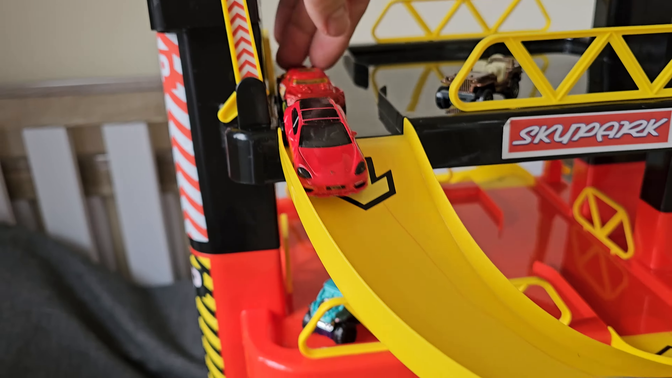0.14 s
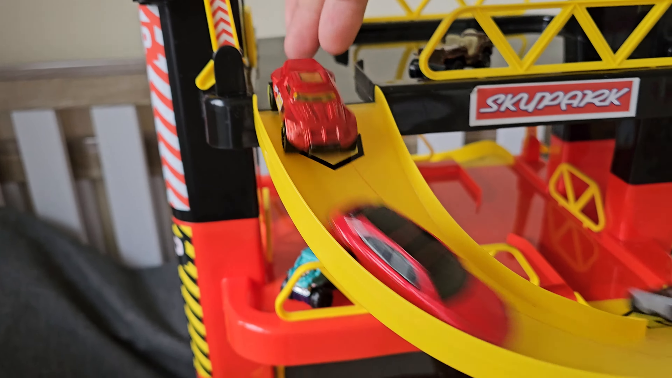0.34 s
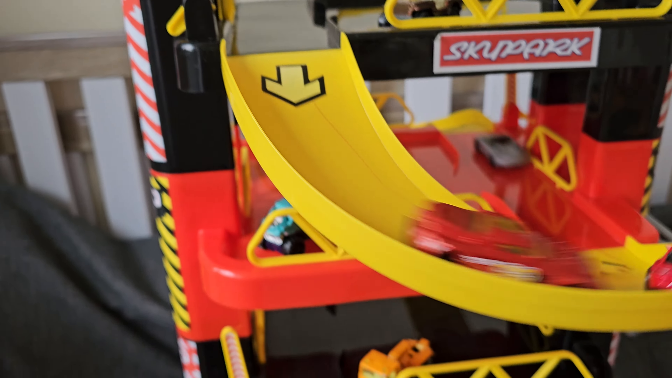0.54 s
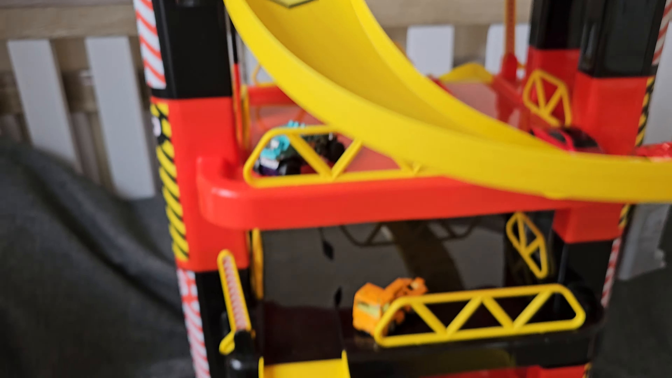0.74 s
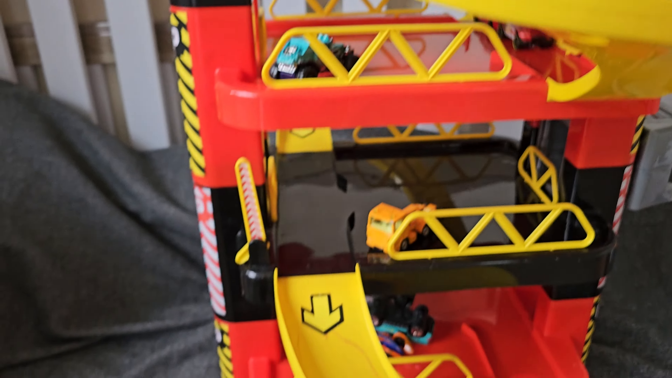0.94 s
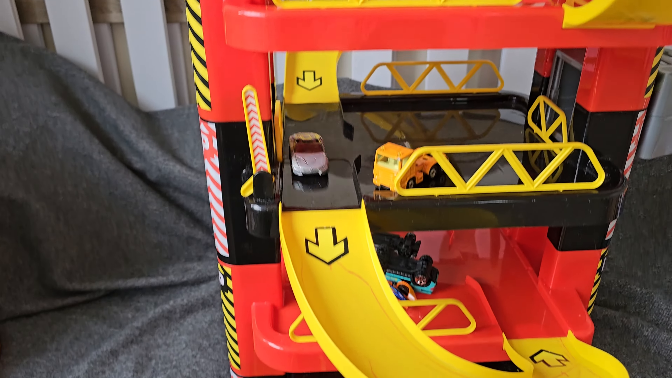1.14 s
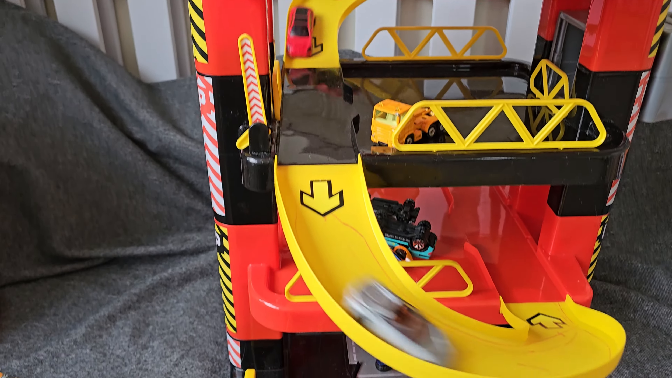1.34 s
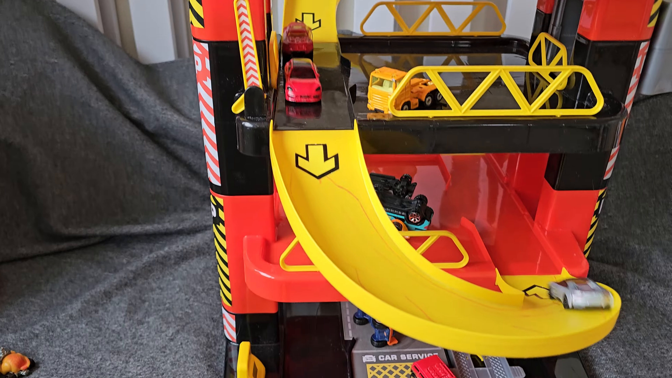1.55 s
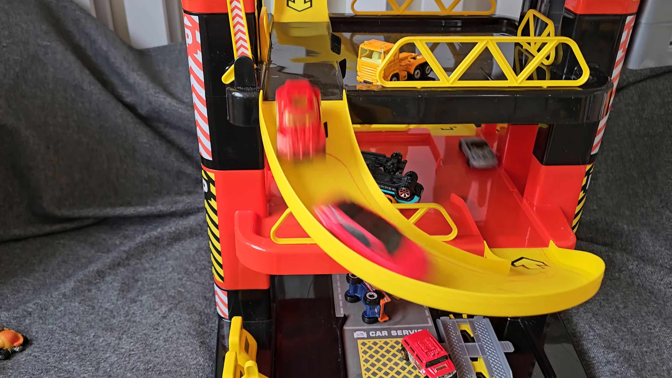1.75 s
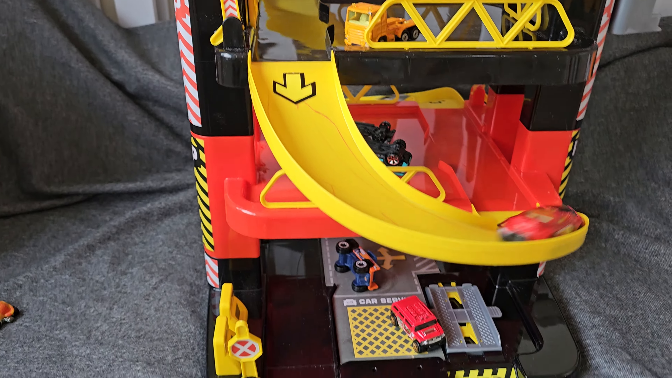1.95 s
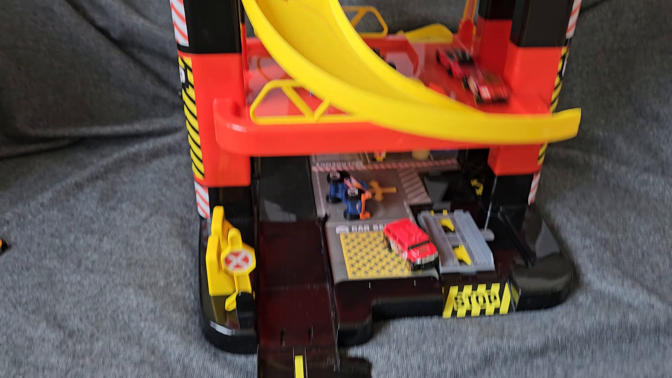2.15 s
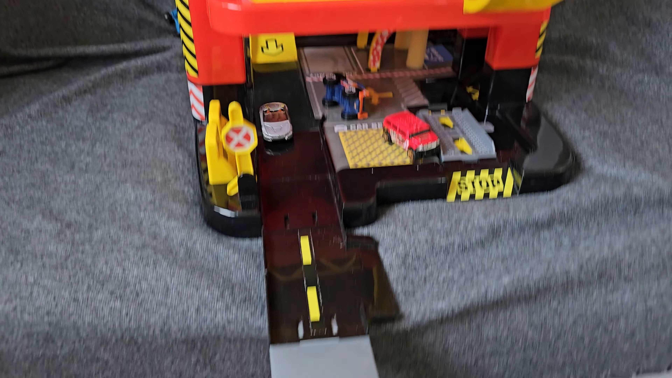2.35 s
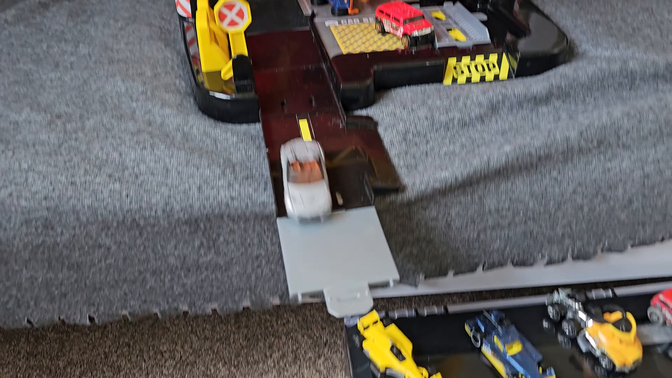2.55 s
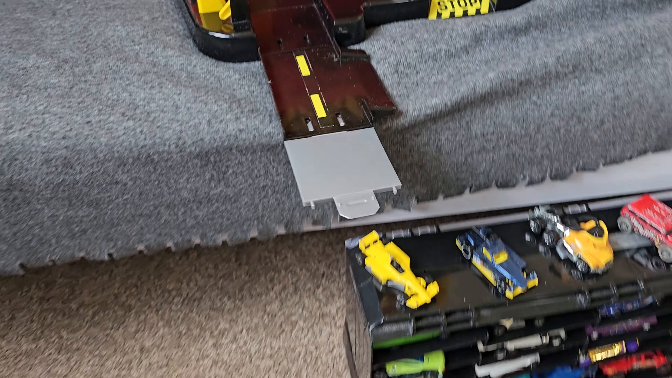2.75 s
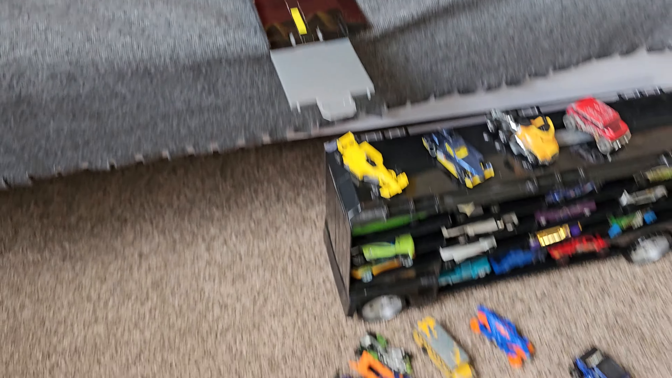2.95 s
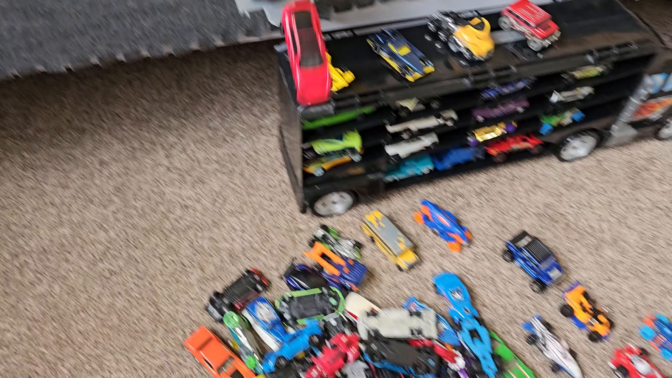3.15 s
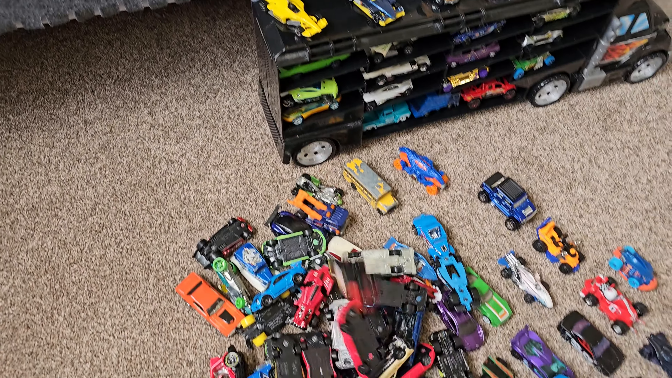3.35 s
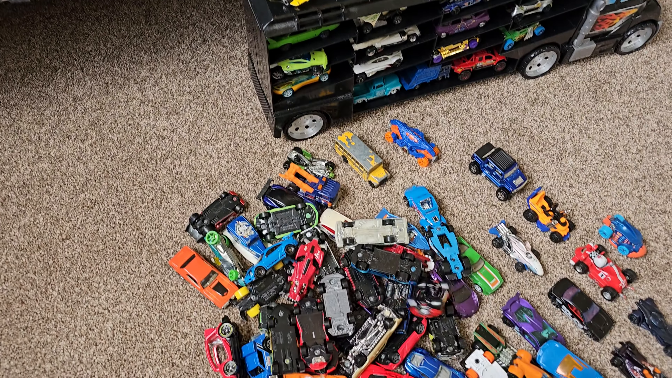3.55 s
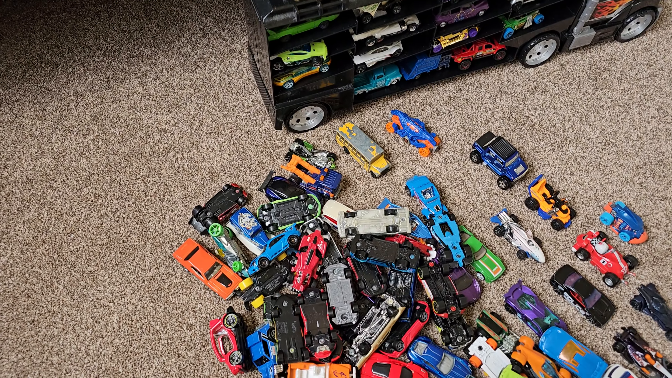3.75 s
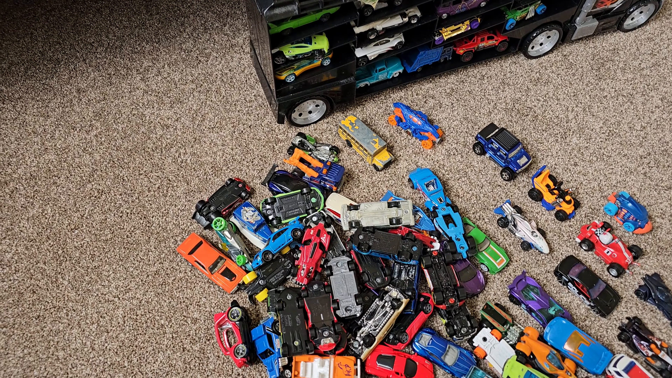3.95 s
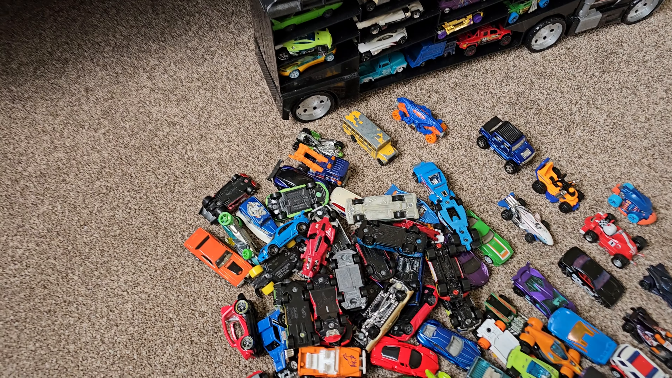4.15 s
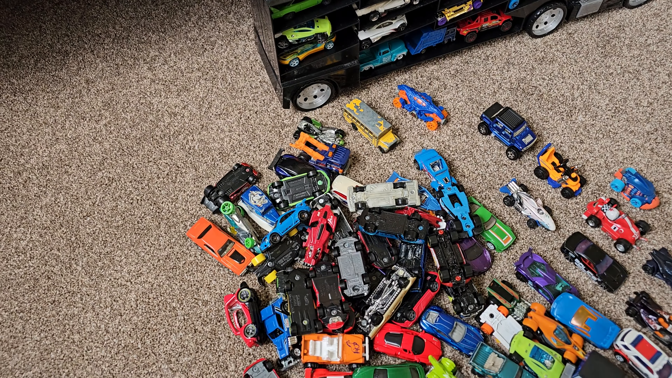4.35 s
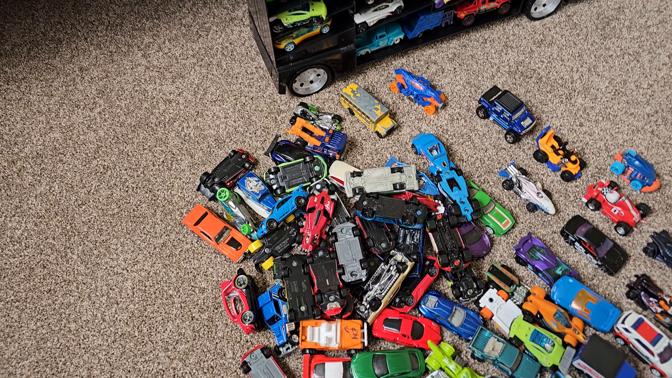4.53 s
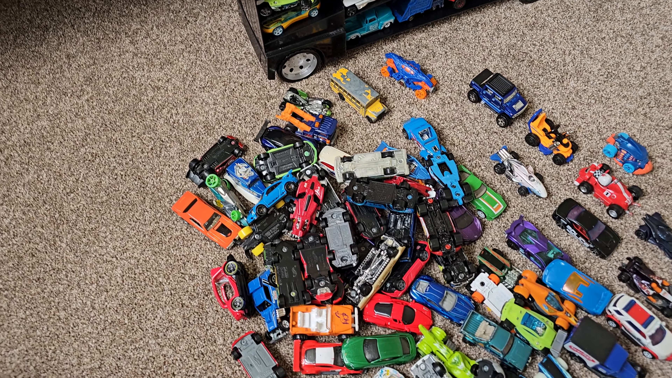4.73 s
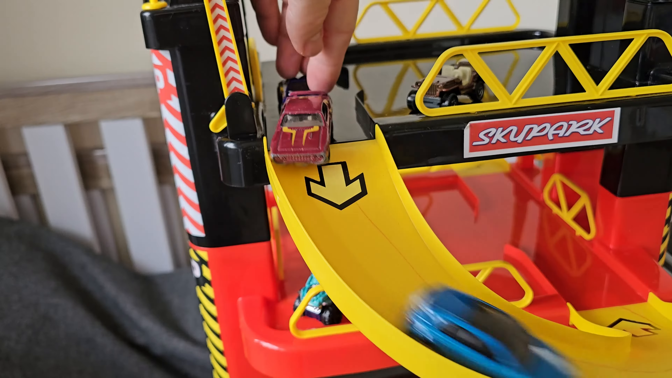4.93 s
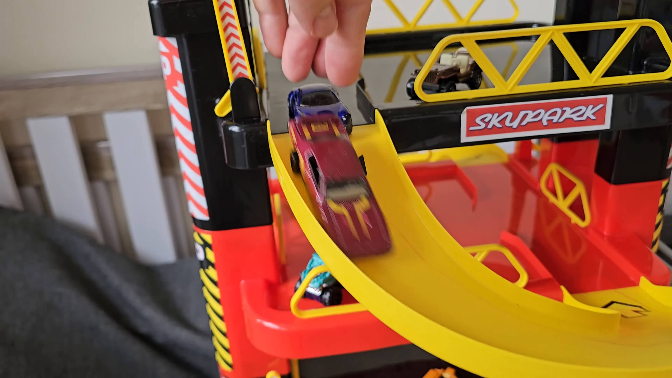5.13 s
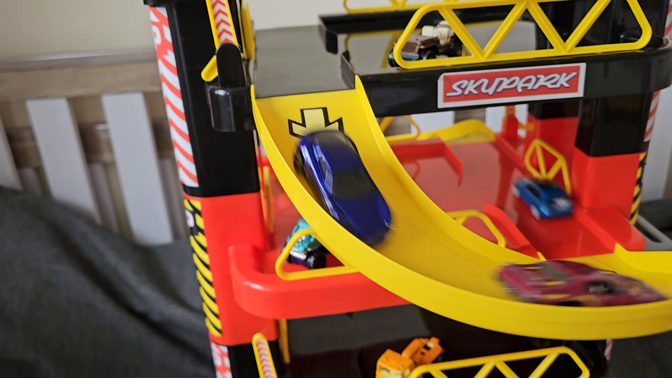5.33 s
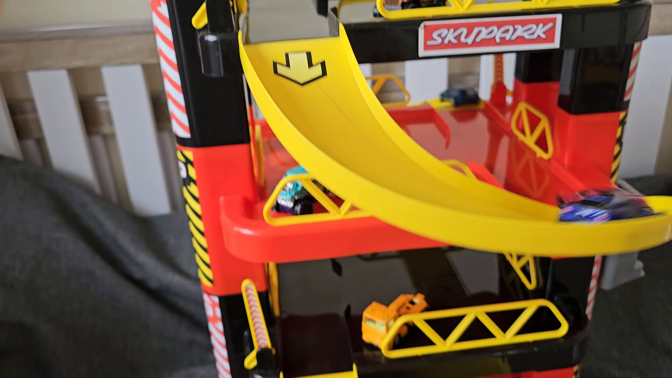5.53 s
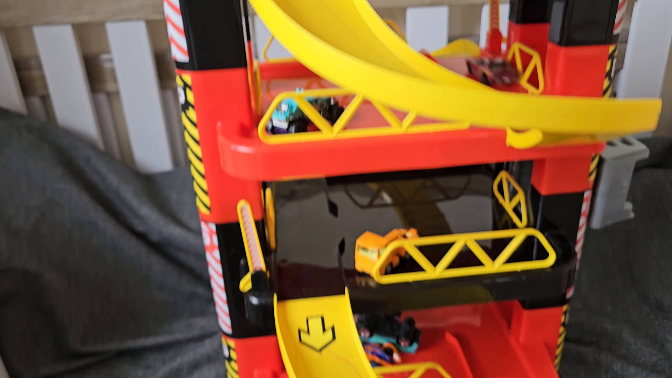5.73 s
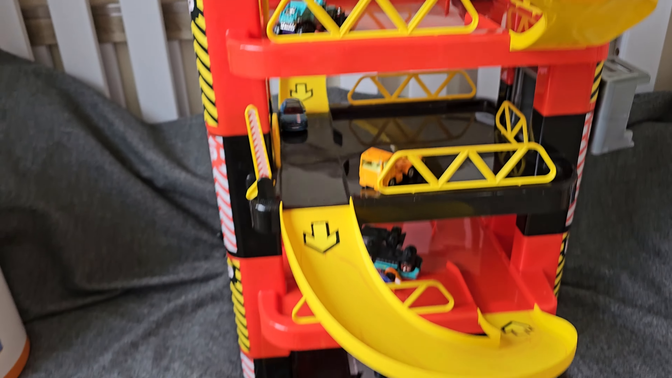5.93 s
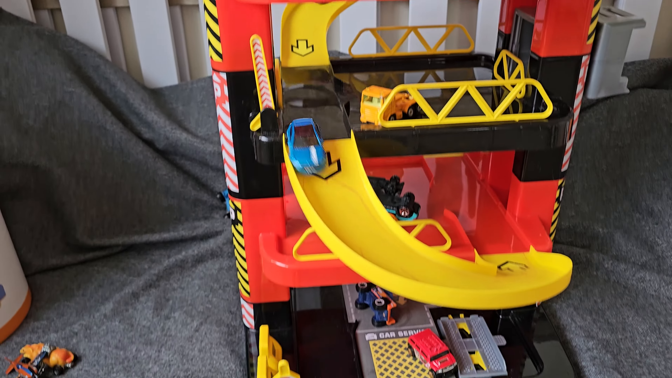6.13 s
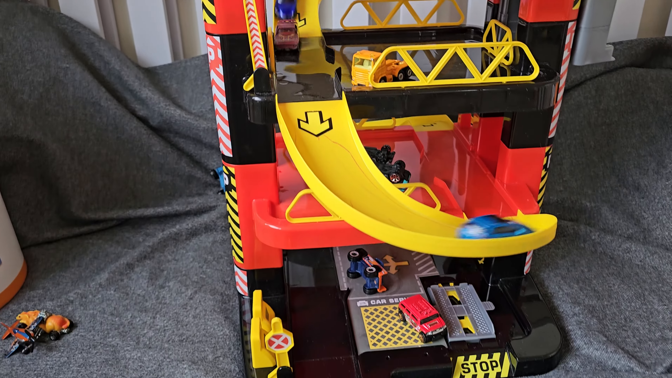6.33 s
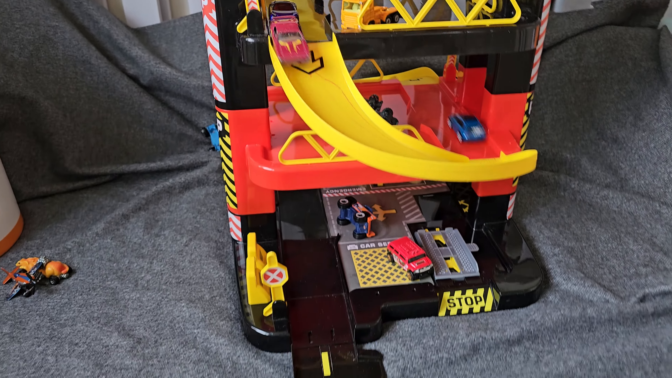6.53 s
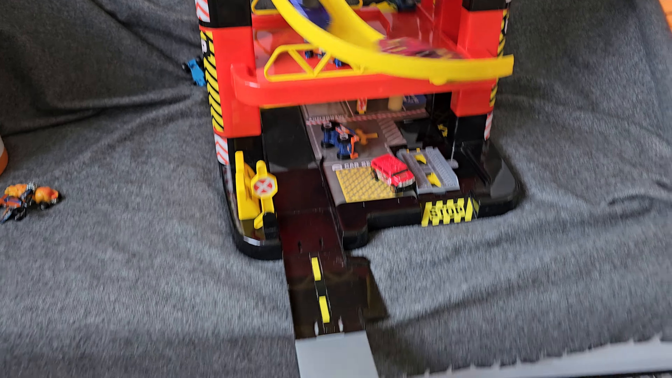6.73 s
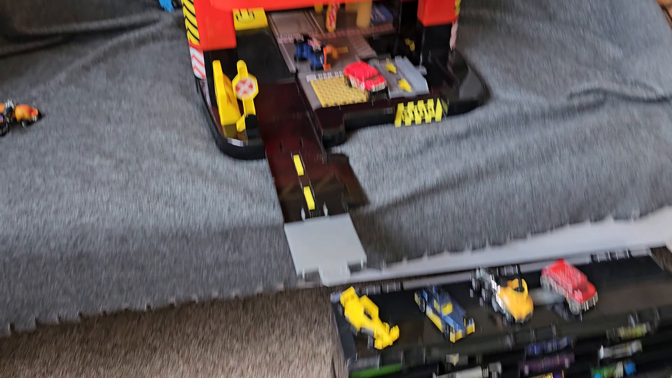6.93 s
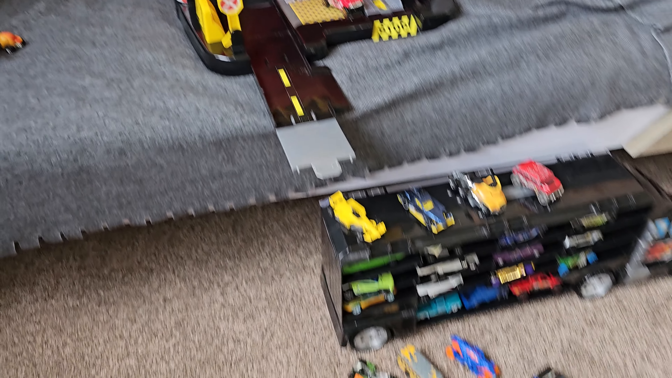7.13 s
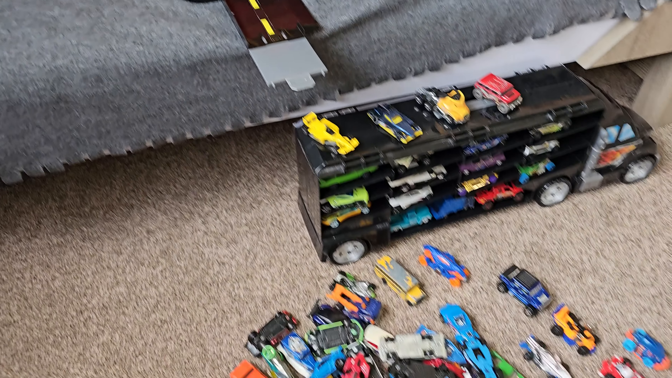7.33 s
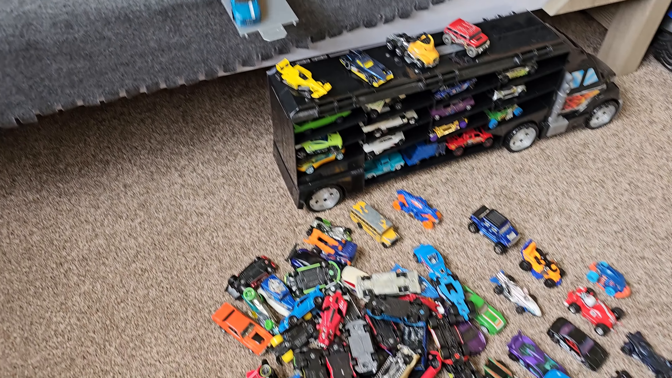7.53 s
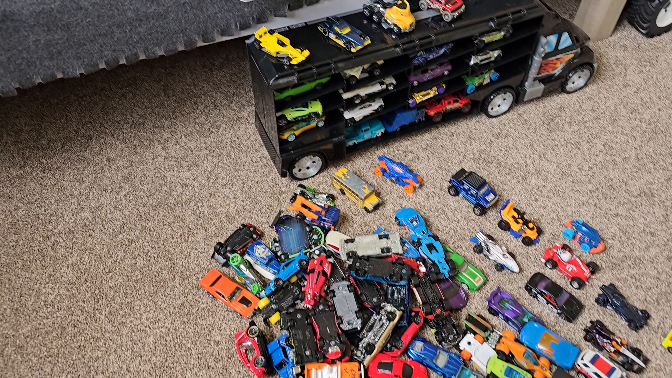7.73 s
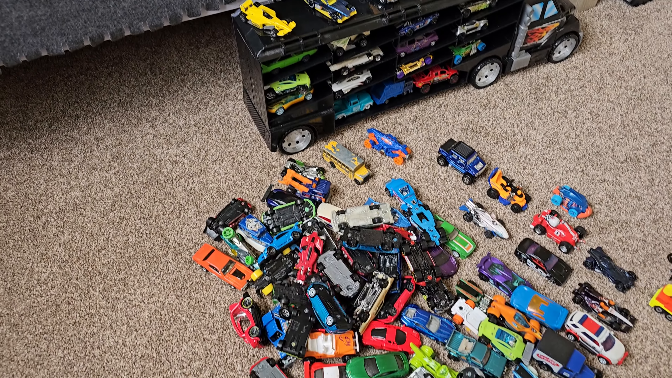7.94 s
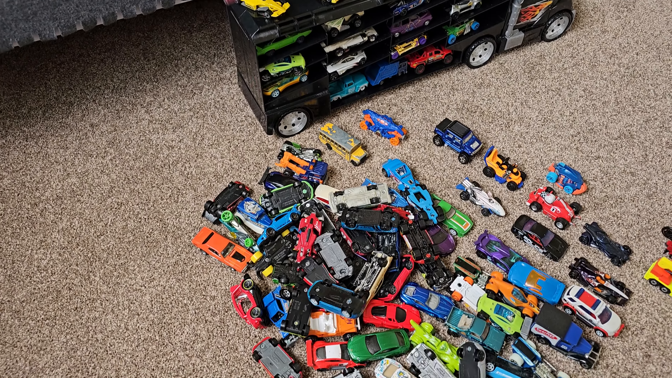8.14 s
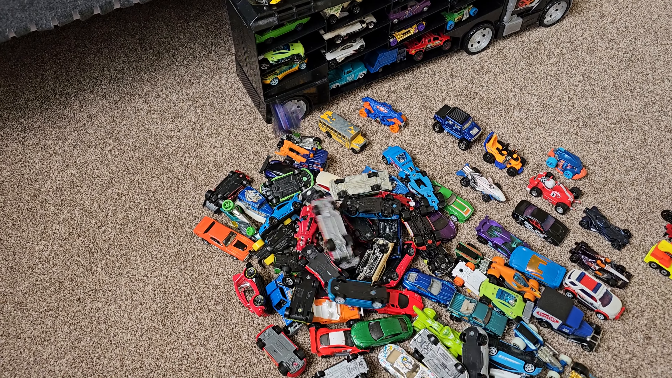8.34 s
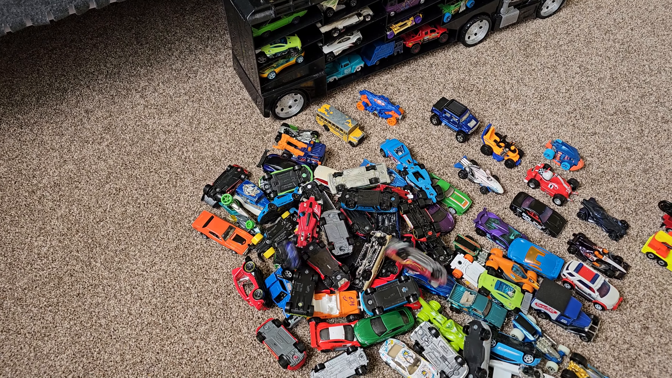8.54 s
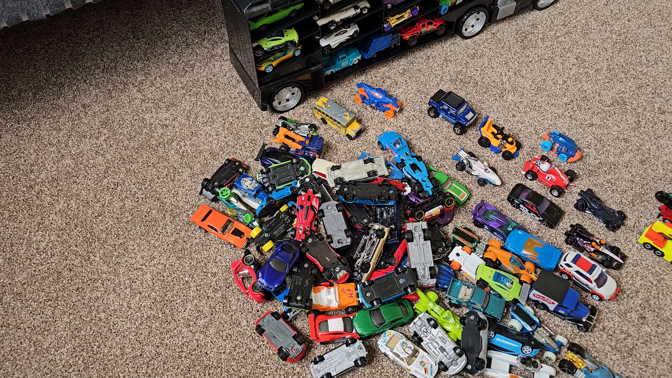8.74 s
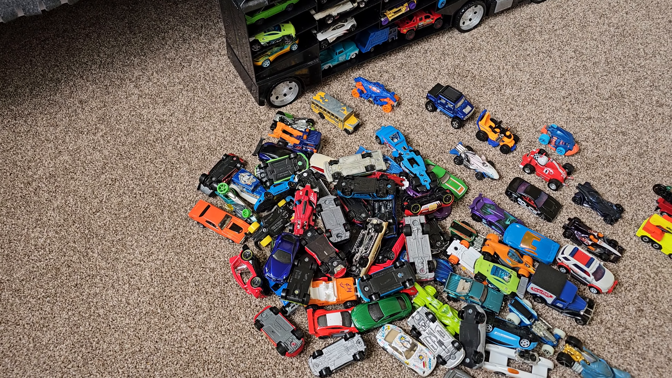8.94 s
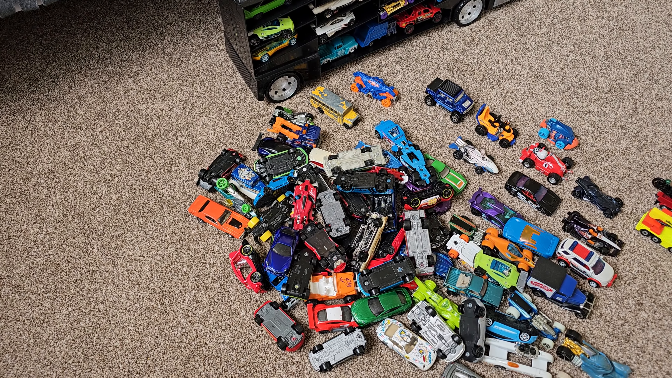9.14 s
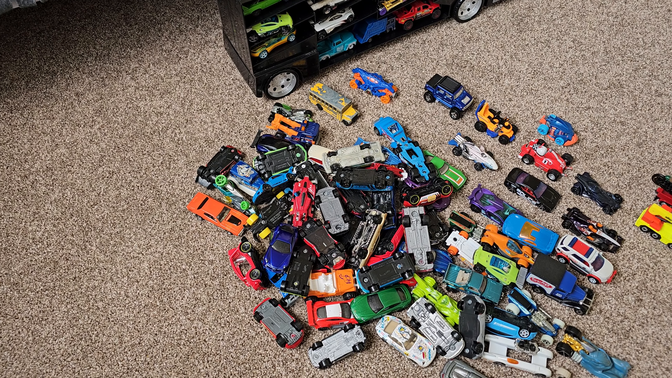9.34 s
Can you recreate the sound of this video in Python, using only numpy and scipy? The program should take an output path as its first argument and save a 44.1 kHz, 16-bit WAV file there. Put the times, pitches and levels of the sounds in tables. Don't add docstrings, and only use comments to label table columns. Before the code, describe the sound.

Small metal toy cars rattle and whir down plastic ramps, knocking at joints, then crash and clatter onto a heap of cars, twice, heard close indoors.

```python
import sys
import numpy as np
from scipy import signal
from scipy.io import wavfile

SR = 44100
rng = np.random.default_rng(int(sys.argv[2]) if len(sys.argv) > 2 else 0)


def pcm_store(signal):
    levels = np.round(np.clip(np.atleast_2d(signal), -1, 1) * 32767)
    wavfile.write(sys.argv[1], SR, levels.astype(np.int16).T)


def boost(x):
    u = np.asarray(x, float) / 20
    return 10 ** u


N = 413658
T = np.arange(N) / SR
BAND_EDGES_HZ = 30 * 2 ** np.arange(0, 9.2, .5)
BOTH, OPPOSED = np.array([[1.], [1.]]), np.array([[1], [-1]])

# frequency in Hz, density in dB per Hz.
HISS = [(76, -31), (130, -0.5), (315, -7), (613, -13), (3000, -18), (5000, -19), (7600, -17.5),
        (16000, -40)]
# frequency in Hz, likeness from 0 to 1.
LIKENESS = [(60, 0.52), (180, 0.54), (550, 0.43), (1650, 0.22), (4970, 0.14)]
# time in seconds, sway in dB.
GRIPS = [
    (4.14, -58),
    (4.355, -69),
    (4.6, -58.5),
    (4.82, -77),
]
# start in seconds, peak in dB, ring in Hz, pan in dB.
TICKS = [(0.122, -53, 640, 22), (4.092, -59, 3000, -1.5), (4.1215, -47, 1236, -13.5),
         (4.152, -47.5, 517, -8.5), (4.172, -53, 492, -12), (4.365, -54, 3000, -7),
         (4.3698, -45.5, 1190, -7), (4.4965, -57.5, 514, -5.5), (4.558, -51.5, 1110, -9),
         (4.564, -48.5, 4210, 13), (4.575, -53, 4150, 6), (4.597, -50, 6300, 11), (4.611, -37.5, 520, 0),
         (4.6335, -42, 600, -7.5), (4.8147, -34.5, 1700, 19.5), (8.76, -48, 330, 6),
         (8.801, -34, 423, -0.5), (8.86, -50.5, 330, 0), (8.92, -60, 320, 4), (8.975, -52, 334, 1),
         (9.1047, -60, 3600, -2), (9.166, -55, 3160, -3.5), (9.173, -55.5, 3730, -13.5),
         (9.2423, -63, 3530, 6),
         (4.941, -48.5, 520, 13.5), (4.1, -67.5, 3000, -0.5), (4.2, -63, 1700, 1),
               (4.267, -69, 6000, 0), (4.294, -65, 3000, 0.5), (4.342, -65, 5970, 2),
               (4.352, -63, 7500, -0.5), (4.375, -56, 3480, 2), (4.405, -58, 4000, 3),
               (4.585, -53.5, 3480, 8.5), (4.68, -70, 2490, 0), (4.773, -69.5, 3500, 1)]
# time in seconds, wheel speed as rattle in dB,
# weight bearing on the tower in dB.
RUNS = [
    [(.2, -35, -48), (.45, -30, -52), (1.2, -31, -46), (1.9, -28, -42.5), (2.25, -30.5, -38),
     (2.75, -33, -47), (2.95, -32, -31.5), (3.13, -34.5, -41), (3.3, -56, -58)],
    [(5.01, -33, -41.5), (5.25, -30, -46), (5.85, -32.5, -46.5), (6.4, -29.5, -40.5), (6.9, -31, -43),
     (7.5, -35, -48), (7.8, -31, -38.5), (8.06, -33, -39.5), (8.3, -51, -73)],
]
# frequency in Hz, density in dB per Hz.
ROLLING = [(30, -6.5), (103, -1.5), (266, 2), (328, -3.5), (721, 1.5), (2170, -12), (7470, -8),
           (16000, -13)]
# frequency in Hz, width in Hz, level in dB.
CHASSIS = [(2274, 88, -6.5), (2970, 830, -5.5), (4100, 8400, -10.5)]
# frequency in Hz, width in Hz, level in dB.
DECK_PANELS = [(455, 230, -4), (600, 230, -1), (790, 49, -2)]
# frequency in Hz, width in Hz, level in dB.
DECK_SPANS = [(248, 71, 7.5), (277, 22, -1.5)]
# frequency in Hz, width in Hz, level in dB.
TOWER = [(58, 35, 3.5), (88, 36, 9.5), (124, 40, -9.5)]
# start in seconds, length in seconds, treble loss in dB.
SHADES = [(.87, 0.053, 13), (.95, 0.037, 10), (2.08, .27, 5.5), (2.68, .14, 11), (5.03, .1, 1),
          (5.73, 0.13, 10), (5.98, 0.071, 2), (6.5, .14, 4.5), (7.11, 0.16, 4.5), (7.62, .15, 6)]
# start in seconds, deck knock peak in dB, deck pitch in Hz, sag of the span in dB.
JOINTS = [(0.348, -21, 262, -43), (0.434, -29, 266, -44.5), (0.652, -24.5, 269, -43),
          (0.762, -27, 260, -48), (0.992, -21, 480, -41), (1.291, -22.5, 566, -38.5),
          (1.357, -20, 490, -37.5), (1.59, -28, 255, -39), (1.673, -26, 646, -38), (1.714, -21, 460, -48),
          (1.79, -22, 546, -45), (1.97, -20, 790, -54.5), (2.162, -17.5, 455, -40), (2.397, -20, 252, -34),
          (2.447, -30, 230, -41), (2.589, -20.5, 460, -38), (5.206, -23.5, 405, -39), (5.32, -25, 260, -46),
          (5.661, -18.5, 590, -41), (5.873, -18.5, 490, -39), (6.262, -23.5, 300, -42),
          (6.372, -14.5, 640, -44), (6.797, -28.5, 450, -55), (6.993, -24, 560, -42),
          (7.067, -18, 487, -37), (7.099, -33, 554, -52), (7.34, -24, 242, -33.5), (7.59, -29, 512, -38),
          (7.917, -25, 235, -30.5)]
# start in seconds, peak in dB, ring in Hz.
NUDGES = [(0.352, -17, 3030), (0.4059, -21, 4300), (0.497, -23, 2150), (0.5385, -23, 7050),
          (0.649, -20, 3870), (0.6653, -27, 7110), (0.7077, -17.5, 2800), (0.9317, -21, 6430),
          (1.011, -21, 3210), (1.0598, -18, 8100), (1.1254, -33, 2900), (1.2973, -21, 2360),
          (1.3585, -11.5, 2500), (1.376, -13.5, 7400), (1.4085, -15.5, 2620), (1.519, -23, 2040),
          (1.5645, -23, 7350), (1.6899, -27, 2290), (1.7163, -25, 2780), (1.7688, -12, 2570),
          (1.795, -22, 2100), (1.8396, -12, 2230), (2.061, -15.5, 3680), (2.1663, -19.5, 2090),
          (2.201, -24, 2060), (2.222, -19, 8000), (2.25, -35, 3150), (2.3616, -14.5, 5500),
          (2.4117, -11, 7300), (2.4447, -15, 7100), (2.449, -19, 5030), (2.497, -18.5, 7700),
          (2.5909, -16.5, 2300), (2.6402, -16, 2060), (5.2093, -18, 2970), (5.2533, -16, 3750),
          (5.3382, -18.5, 2050), (5.6413, -24, 7940), (5.667, -17, 2800), (5.7079, -17.5, 3090),
          (5.873, -25, 2100), (5.916, -14.5, 3680), (6.042, -21, 2310), (6.2591, -18, 2370),
          (6.3, -19, 2860), (6.3744, -17, 3450), (6.404, -14.5, 3320), (6.3743, -14.5, 1710),
          (6.449, -17, 3260), (6.4958, -19, 3120), (6.546, -31, 3140), (6.693, -19, 2300),
          (6.7434, -23, 6470), (6.8217, -23, 7350), (7.334, -13.5, 4640), (7.3716, -10.5, 7600),
          (7.4197, -19, 4230), (7.0432, -16.5, 3830), (7.4588, -20.5, 4940), (7.6526, -22, 3590)]
# frequency in Hz, level in dB, t60 in seconds.
CAR_BODY = [(1308, -3, 0.054), (2000, -3.5, 0.13), (3000, -20, 0.082), (4150, -3, 0.042),
            (6430, -6.5, 0.061), (7500, -6.5, 0.0034)]
# start in seconds, peak in dB, frequency in Hz, t60 in seconds.
PINGS = [(.93, -20, 6430, 0.09), (1.769, -16.5, 2510, 0.056), (3.374, -13, 6430, 0.14),
         (3.437, -34, 2870, 0.088), (3.448, -27, 2000, 0.13), (3.563, -34, 6300, 0.11),
         (3.658, -47, 3100, 0.16), (3.686, -57, 4610, 0.096), (8.5, -29, 6300, 0.067),
         (8.447, -18.5, 1910, 0.16), (8.495, -24, 1890, .12), (8.567, -29.5, 1200, 0.11),
         (8.63, -36, 1197, 0.12), (8.662, -43, 6450, 0.13), (2.062, -27, 6430, .12),
         (7.722, -31, 11650, 0.083), (6.578, -32, 3870, .1)]
# start in seconds, length in seconds, level in dB.
CROSSINGS = [(1.72, 0.062, -36.5), (2.17, 0.16, -43), (2.4, 0.11, -48), (2.59, 0.043, -44),
             (7.061, 0.1355, -38.5), (7.58, 0.1, -36), (7.9, 0.092, -56)]
# frequency in Hz, width in Hz, level in dB.
LOOSE_SPAN = [(233.2, 6.9, -4.5), (455, 15, -4), (590, 30, -5.5), (690, 17, -19)]
# start in seconds, peak in dB, ring in Hz,
# treble over peak in dB, pan in dB.
CRASHES_1 = [(2.8305, 2.5, 1950, -11, -1.5), (2.8384, -1, 2760, -31.5, 3), (2.9262, -14, 2800, -23, 3),
             (2.9572, -17, 2030, -10, -0.5), (2.9921, -19, 2380, -16, 2.5), (3.0155, -20, 6600, -12.5, -4),
             (3.0464, -13.5, 7500, -13.5, -2), (3.0535, -4.5, 3840, -6, -0.5),
             (3.0654, -18.5, 3630, -10, 5), (3.0874, -12.5, 7650, -18, 3), (3.1954, -25, 2370, -11, 2)]
# start in seconds, peak in dB, ring in Hz,
# treble over peak in dB, pan in dB.
LANDINGS_1 = [(3.308, -5, 2160, -4, 2), (3.3191, 1, 2020, -33, 4.5), (3.326, -9, 1940, -38, 8),
              (3.365, -1.5, 6550, -9, -4), (3.3988, -6, 7550, -4, 1), (3.386, -11.5, 6500, -20, 3),
              (3.455, -6.5, 6500, -12.5, 1), (3.474, -18, 4000, -6, -2), (3.4349, -7.5, 3330, -46, 4.5),
              (3.5013, -17.5, 4080, -24, 0), (3.544, -16.5, 7100, -11, 3), (3.564, -14.5, 6330, -16, -0.5),
              (3.638, -35, 1500, -15, 0), (3.6567, -29.5, 1770, -16, 2), (3.684, -35, 4610, -20, -6),
              (3.738, -42, 6600, 0, -1), (3.7735, -40, 4060, -25, 3), (3.781, -47, 2200, -19, 1),
              (3.804, -56, 2670, -26, 4), (3.824, -43.5, 5300, -5, 0)]
# start in seconds, peak in dB, ring in Hz,
# treble over peak in dB, pan in dB.
CRASHES_2 = [(7.7815, -5.5, 2920, -3.5, 0), (7.795, -5, 4030, -37, 4), (7.8652, -19, 4840, -31, 13),
             (7.909, -15.5, 4500, -13.5, 5), (7.9197, -10.5, 2410, -9, 3), (7.9458, -11.5, 3900, -14, 6),
             (7.9703, -12, 3660, -13, -3), (7.986, -18, 2500, -9, 7), (8.005, -28.5, 3500, -7, 0),
             (8.0294, -20.5, 5130, -16, 11), (8.1823, -27, 3830, -10, 4), (8.227, -32.5, 2300, -7.5, 10)]
# start in seconds, peak in dB, ring in Hz,
# treble over peak in dB, pan in dB.
LANDINGS_2 = [(8.306, -17, 3530, -11, 7), (8.323, -3.5, 3800, -7, 1), (8.346, 1, 2000, -10.5, -1.5),
              (8.401, -2.5, 3770, -6.5, 1), (8.4085, -6, 8200, -34, -3), (8.4251, -0.5, 2560, -9.5, 0),
              (8.428, -12, 4160, -7.5, -2), (8.433, -2, 1600, -10, 0), (8.445, -12, 1910, -18.5, 3),
              (8.4819, -7, 6355, -7, 4), (8.4976, -10.5, 6360, -17, 6), (8.5515, -18, 1850, -9, 3),
              (8.5644, -7, 6400, -12, -1), (8.6045, -11, 3570, -9, 0.5), (8.6474, -14.5, 5340, -11, 3.5),
              (8.661, -15.5, 2720, -12, 3), (8.743, -40, 2000, -15, 7), (8.7468, -25.5, 2340, -16, 5),
              (8.754, -38, 4510, -13, 3), (8.8026, -40, 5957, -9, 3), (8.8374, -46, 1940, -23, 6),
              (8.951, -45, 2345, -10.5, 7.5), (8.984, -54.5, 2290, -20, 5)]
# start in seconds, peak in dB,
# frequency in Hz, t60 in seconds.
THUMPS = [(2.83, -25, 55, 0.27), (2.95, -24.5, 83, 0.27), (3.312, -32.5, 55.3, 0.48),
          (7.786, -21, 69.6, .25), (7.841, -26, 50.5, 0.21), (8.325, -24, 109, 0.19),
          (8.42, -33.5, 55, 0.25), (8.79, -45.5, 320, 0.21), (8.9, -61, 310, 0.4),
          (8.959, -58.5, 328, 0.25), (8.86, -67, 1420, 0.38)]
# start in seconds, clatter in dB, busy time in seconds,
# floor thud in dB.
HEAP = [
    (3.31, -23.5, 0.069, -36.5),
    (8.324, -23.5, 0.17, -35.5),
]
# frequency in Hz, density in dB per Hz.
CLATTER = [(300, -15.5), (762, -9.5), (1210, -20), (1690, -2), (2320, 0), (5900, -3), (6410, -11.5),
           (16000, -10.5)]
# start in seconds, end in seconds, gain in dB.
SHOTS = [
    (0, 0.137, -6),
    (.181, 4.948, 1),
    (4.996, 9.5, 1),
]


def rms_one(x):
    return x / np.sqrt(np.mean(x ** 2) + 1e-20)


def at_hz(points, hz):
    points_hz, values = np.array(points).T
    return np.interp(np.log(hz), np.log(points_hz), values)


def band(x, low_hz, high_hz):
    sos = signal.butter(2, [low_hz, min(high_hz, .45 * SR)], "band", fs=SR, output="sos")
    return signal.sosfilt(sos, x)


def resonate(x, hz, width_hz):
    r = np.exp(-np.pi * width_hz / SR)
    return signal.lfilter([(1 - r * r) / 2, 0, (r * r - 1) / 2], [1, -2 * r * np.cos(2 * np.pi * hz / SR), r * r], x)


def drift(rate):
    r = np.exp(-80 * np.pi * rate / SR)
    slow = signal.lfilter([1], [1, -2 * r, r * r], rng.standard_normal(N // 40 + 2002))[2000:]
    return np.interp(np.arange(N) / 40, np.arange(len(slow)), rms_one(slow))


def dying(kicks, die_s):
    return signal.lfilter([1], [1, -np.exp(-1 / (die_s * SR))], kicks)


def contacts(per_s, spread_db, die_s, bed):
    sizes = boost(2 * spread_db * np.minimum(rng.exponential(1, N), 4))
    power = dying(sizes * (rng.random(N) < per_s / SR), die_s)
    return np.sqrt(bed + power / power.mean())


def coloured(spectrum, patchy_db, loudness):
    white = rng.standard_normal((2, 2, N)) * loudness
    out = []
    for k, (low, high) in enumerate(zip(BAND_EDGES_HZ, BAND_EDGES_HZ[1:])):
        mid, side = band(white[k % 2], low, high)
        hz = np.sqrt(low * high)
        alike = np.clip(at_hz(LIKENESS, hz) * 2.4 - .3, 0, 1)
        gain = boost(at_hz(spectrum, hz) + patchy_db * drift(8.0))
        out.append(gain * (np.sqrt(1 + alike) * mid + np.sqrt(1 - alike) * side * OPPOSED))
    return np.array(out)


def panned(pan_db):
    return boost(np.clip(pan_db, -16, 16) * .5 * OPPOSED)


def add(out, sound, s):
    i = round(s * SR)
    out[:, i:i + sound.shape[1]] += sound[:, :N - i]


def background():
    hum_hz, hum_db, hiss_db = 89, -61, -77
    hum_level = boost(hum_db + 1.5 * drift(5))
    hum = hum_level * np.sin(2 * np.pi * np.cumsum(hum_hz + 0.5 * drift(9)) / SR)
    bands = coloured(HISS, 0.74, 1)
    hiss = rms_one(bands[5:].sum(0))
    hiss = hiss + boost(6.5) * rms_one(bands[:2].sum(0)) + boost(3.5) * rms_one(bands[3])
    hiss = boost(hiss_db) * hiss
    hiss = hiss - 0.9 * resonate(hiss, 10000, 3200)
    sway_db = np.max([db - 133 * np.abs(T - s) for s, db in GRIPS], axis=0)
    creak_db = sway_db - 7
    sway_db = np.maximum(sway_db, -82)
    white = rng.standard_normal((2, N))
    grip = boost(sway_db) * rms_one(band(white[0], 27, 60)) + boost(creak_db) * rms_one(band(white[1], 90, 194))
    skin = contacts(600., 2.7, .002, bed=.2) * band(rng.standard_normal((2, N)), 4500, 8500)
    return hum + hiss + grip + boost(creak_db - 7.5) * skin


def ticks():
    out, t = np.zeros((2, N)), T[:2500]
    for s, db, hz, pan_db in TICKS:
        fade = np.exp(-t / 0.0012) + 0.02 * np.exp(-t / 0.012)
        mid, side = rng.standard_normal((2, 2500)) * fade
        mid[3] += 5.0
        push = mid + 1.4 * side * OPPOSED
        click = .6 * band(push, 900, 3600) + .5 * band(push, 2600, 5600) + band(push, 5200, 8800)
        click = click + .08 * band(push, 9000, 13000) + .7 * resonate(push, 3050, 500)
        click = click * np.clip(hz / 1700, .5, 1)
        housing = 4.7 * resonate(push, 510, 140) + 2.1 * resonate(push, 1040, 300) + 6.3 * band(push, 100, 290)
        tick = click + 2.7 * resonate(push, hz, hz / 5.0) + housing * np.clip(600 / hz, 0, 1) ** 2
        add(out, boost(db) * panned(pan_db) * tick / np.abs(tick.mean(0)).max(), s)
    return out


def run_curves(lead_s=.03):
    out = np.full((2, N), -130.)
    for rows in RUNS:
        s, *columns = np.transpose(rows)
        on = (T >= s[0] - lead_s) & (T <= s[-1] + .012)
        out[:, on] = [np.interp(T[on], s, c) for c in columns]
    return out


def after(s, db, die_s):
    kicks = np.zeros(N)
    np.add.at(kicks, (s * SR).astype(int), boost(2 * db))
    return dying(kicks, die_s)


def plus(db, power):
    return 10 * np.log10(boost(2 * db) + power)


def shaking():
    speed_db, weight_db = run_curves()
    s, db, hz = np.transpose(NUDGES)
    tilt_db = 8 * np.log2(hz / 5000)
    rattle_db = plus(speed_db, after(s, db - 29 - tilt_db, 0.039))
    fizz_db = plus(speed_db - 7, after(s, db - 29 + tilt_db, 0.039))
    s, db, _, sag_db = np.transpose(JOINTS)
    deck_db = plus(speed_db - 12, after(s, db - 16.5, 0.04))
    boom_db = plus(weight_db - 0.5, after(s, sag_db, .09))
    tower_db = plus(weight_db, after(s, sag_db + 0.5, 0.078))
    return rattle_db, fizz_db, deck_db, boom_db, tower_db


def ringing(shaken, modes, direct, lift_db, wander_db, rate):
    rings = sum(boost(db + lift_db + wander_db * drift(rate)) * resonate(shaken, hz, w) for hz, w, db in modes)
    return rms_one(direct * shaken + rings)


def axle_knocks(per_s, cycles):
    sizes = boost(3 * np.minimum(rng.exponential(1, N), 2)) * (rng.random(N) < per_s / SR)
    part = rng.integers(0, 16, N)
    knocks = sizes * (rng.standard_normal((2, N)) + rng.standard_normal(N))
    out = 0
    for k, hz in enumerate(np.geomspace(1800, 4400, 16)):
        ring = resonate(knocks * (part == k) + 1e-18, hz, hz / cycles)
        out = out + boost(2.5 * drift(4)) * 1500 / hz * ring
    return rms_one(out)


def shade():
    loss_db = 0
    for s, length, db in SHADES:
        sets_in = np.clip((T - s) / 0.015 + 1, 0, 1)
        lifts = np.clip((s + length - T) / 0.013 + 1, 0, 1)
        loss_db = loss_db + db * sets_in * lifts
    return loss_db


def rolling():
    rattle_db, fizz_db, deck_db, boom_db, tower_db = shaking()
    bands = coloured(ROLLING, 1.5, contacts(900., 3.0, 0.0025, bed=0.4))
    bodies = ringing(bands[10:15].sum(0), CHASSIS, 0.97, 8.2, 0.46, 1.0)
    rattle = bodies + .75 * axle_knocks(2200, 13)
    loss_db = shade()
    treble = bands[15] + boost(-loss_db / 2) * bands[16] + boost(-loss_db) * bands[17:].sum(0)
    fizz = ringing(treble, [(7300, 1600, 0.012)], 0.47, -3.5, 1.7, 7.8)
    decks = ringing(bands[7:10].sum(0), DECK_PANELS, 0.98, 2.3, 4.1, 23.0)
    boom = ringing(bands[5:7].sum(0), DECK_SPANS, 0.64, 3.6, 0.88, 10)
    tower = ringing(bands[:5].sum(0), TOWER, 0.91, 2, 0.98, 6.1)
    cars = boost(rattle_db - 1.21) * rattle + boost(fizz_db + 4.0) * fizz
    ramps = boost(deck_db + 1.1) * decks + boost(boom_db - 4.5) * boom
    return cars + ramps + boost(tower_db - 3.5) * tower


def joints():
    out, t = np.zeros((2, N)), T[:8000]
    for s, db, hz, _ in JOINTS:
        push = rng.standard_normal(8000) * (np.exp(-t / 0.003) + 0.75 * np.exp(-t / 0.071))
        knock = resonate(push, hz, 54) + 0.12 * resonate(push, 0.87 * hz, 46) + 0.11 * resonate(push, 256, 25)
        knock = knock + 0.22 * band(push, 150, 2000)
        add(out, boost(db - 0.5) * knock / np.abs(knock).max() * BOTH, s)
    return out


def blows(events, crack_s, rise_s, ring_db, width_hz, car_db, snap, thin):
    out, t = np.zeros((2, N)), T[:5000]
    rise = 1 - np.exp(-t / rise_s)
    fade = np.exp(-t / crack_s) + 0.13 * np.exp(-t / (6 * crack_s))
    for s, db, hz, treble_db, pan_db in events:
        mid, side = rng.standard_normal((2, 5000)) * fade * rise
        mid[6] += snap
        push = mid + 0.84 * side * OPPOSED
        crack = band(band(push, max(1100, thin * hz), 9200), max(1200, thin * hz), 17000)
        crack = crack + boost(treble_db + 8) * band(push, 8000, 16500) * panned(3.0)
        blow = crack + boost(ring_db) * resonate(push, hz, width_hz) + 0.3 * band(mid, 250, 650)
        luck = rng.standard_normal((len(CAR_BODY), 2))
        for (f, d, t60), (g, e) in zip(CAR_BODY, luck):
            blow = blow + boost(d + car_db + 5 * g) * resonate(push, f * (1 + .09 * e), 4.4 / t60)
        blow = band(blow, 100, 20000 * min(1, boost(db / 2 + 12.5)))
        add(out, boost(db) * panned(pan_db) * blow / np.abs(blow.mean(0)).max(), s)
    return out


def nudges():
    events = [(s, db, hz, -16 + 3.0 * np.log2(hz / 4000), 1.2) for s, db, hz in NUDGES]
    return blows(events, crack_s=0.004, rise_s=0.0007, ring_db=9, width_hz=260, car_db=-1, snap=2, thin=.6)


def pings():
    out, t = np.zeros((2, N)), T[:9000]
    for s, db, hz, t60 in PINGS:
        add(out, boost(db - 60 * t / t60) * np.sin(2 * np.pi * hz * t) * BOTH, s)
    return out


def crossings():
    on = 0
    for s, length, db in CROSSINGS:
        leaves = boost(-400 * np.maximum(0, T - s - length))
        on = on + boost(db) * np.clip((T - s) / 0.0054, 0, 1) * leaves
    rough = on * rng.standard_normal(N)
    return sum(boost(db) * resonate(rough, hz, w) * np.sqrt(SR / (np.pi * w)) for hz, w, db in LOOSE_SPAN)


def crashes_and_landings():
    events = CRASHES_1 + LANDINGS_1 + CRASHES_2 + LANDINGS_2
    return blows(events, crack_s=.003, rise_s=.0003, ring_db=8, width_hz=300, car_db=3, snap=1.5, thin=0)


def thumps():
    out, t = np.zeros((2, N)), T[:20000]
    for s, db, hz, t60 in THUMPS:
        slow = signal.lfilter([.004], [1, -.996], rng.standard_normal(len(t)))
        swing = np.sin(2 * np.pi * hz * t + .05 * np.cumsum(slow))
        add(out, boost(db - 60 * t / t60) * (1 - np.exp(-t / 0.02)) * swing * BOTH, s)
    return out


def settling():
    fall_db_per_s, still_db, stop_db_per_s, thud_db_per_s = 82.5, -49.5, 60, 46
    clatter_db, thud_db = np.full((2, N), -130.)
    for s, db, busy_s, floor_db in HEAP:
        on = T >= s
        t = T[on] - s
        falling = db - fall_db_per_s * np.maximum(0, t - busy_s)
        falling += np.minimum(0, falling - still_db) * stop_db_per_s / fall_db_per_s
        clatter_db[on] = falling
        thud_db[on] = floor_db - thud_db_per_s * t
    return clatter_db, thud_db


def heap():
    clatter_db, thud_db = settling()
    clatter = coloured(CLATTER, 2.5, contacts(450., 2.8, .003, bed=.3))[7:].sum(0)
    rings = sum(boost(d + 5.5 + 5 * drift(22)) * resonate(clatter, f, 8.7 / t60) for f, d, t60 in CAR_BODY)
    clatter = clatter + rings
    near = band(clatter, 250, 5300)
    clatter = near + boost(np.minimum(0, (clatter_db + 41.5) / 2)) * (clatter - near)
    thud = rms_one(band(band(rng.standard_normal(N), 28, 220), 31, 370))
    quieting_db = np.minimum(0, (clatter_db + 34) * 0.33)
    return boost(clatter_db - 3.5) * panned(1.5) * rms_one(clatter) + boost(thud_db + quieting_db) * thud


def room(x, t60_s=0.17):
    t = T[:SR // 2]
    scatter = rng.standard_normal((2, len(t))) * np.clip((t - .003) / 0.0024, 0, 1)
    tail = scatter * boost(-60 * t / t60_s)
    tail = tail / np.sqrt((tail ** 2).sum(1, keepdims=True))
    return signal.fftconvolve(x, tail, axes=1)[:, :N]


def scene():
    hits = nudges() + pings() + crashes_and_landings()
    ramps = panned(0.44) * rolling() + joints() + crossings()
    toys = ramps + thumps() + hits + boost(-5.5) * room(hits) + heap()
    toys[1] = np.roll(toys[1], 3)
    return toys + ticks() + background()


def top_cut(x):
    return signal.sosfilt(signal.butter(12, 16960, fs=SR, output="sos"), x)


def record(dry):
    gate = 0
    for start, end, db in SHOTS:
        gate = gate + boost(db) * np.clip((T - start) / 0.00089, 0, 1) * np.clip((end - T) / 0.001, 0, 1)
    rounded = .95 * np.tanh(dry * gate / 1.04)
    below = signal.sosfiltfilt(signal.cheby2(16, 30, 16050, fs=SR, output="sos"), rounded)
    top = signal.sosfilt(signal.cheby2(12, 50, 17000, fs=SR, output="sos"), rounded - below)
    shelved = below + boost(-39) * top
    return top_cut(shelved)


dry = scene()
out = record(dry)
pcm_store(out)
```